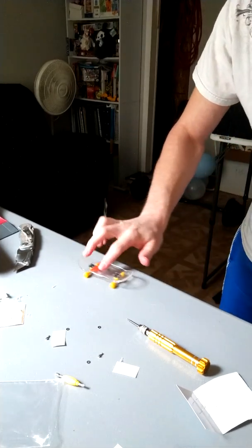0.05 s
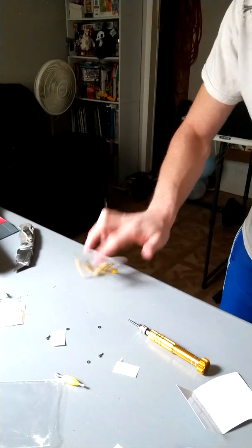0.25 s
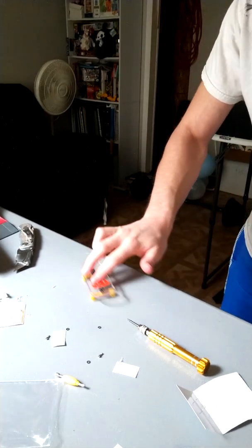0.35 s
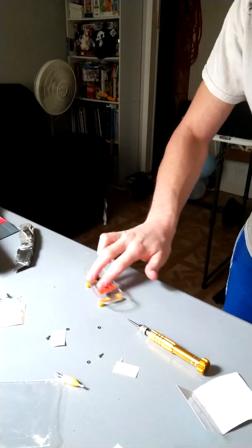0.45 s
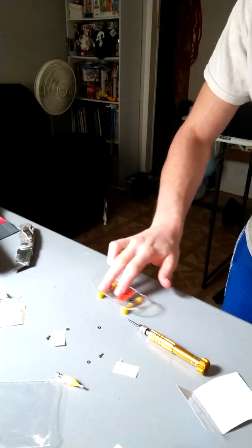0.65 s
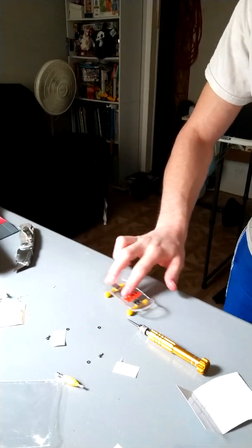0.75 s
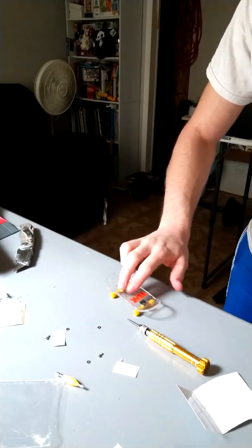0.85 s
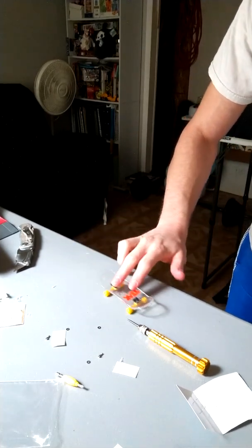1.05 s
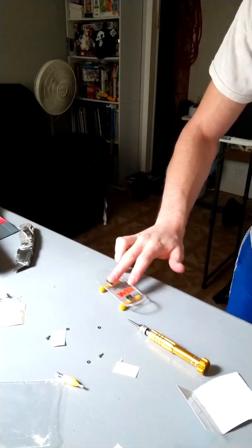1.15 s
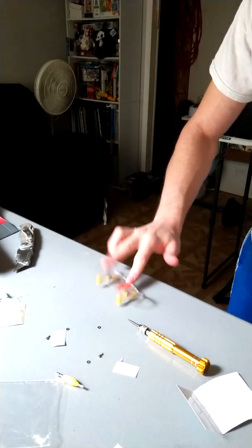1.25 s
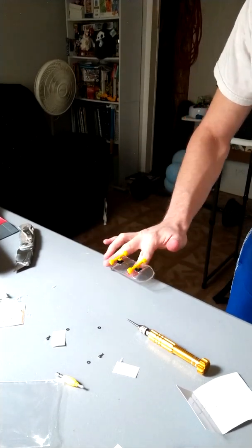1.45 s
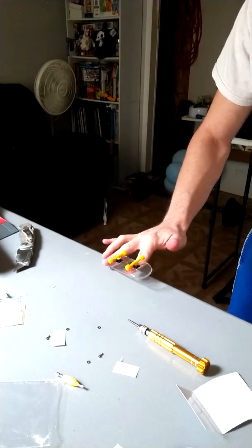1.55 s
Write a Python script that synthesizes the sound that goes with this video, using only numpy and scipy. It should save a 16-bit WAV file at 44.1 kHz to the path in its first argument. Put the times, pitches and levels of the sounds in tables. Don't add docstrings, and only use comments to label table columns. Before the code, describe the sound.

Tiny toy skateboard on a table, close to a phone in a small room: light wheel rumble and axle rattle, crisp pop, brief gap, overloaded burst of plastic, metal and wood knocks, then soft rolling, scuffs and thin clinks.

```python
import sys
import numpy as np
from scipy import signal
from scipy.fft import rfft, irfft
from scipy.io import wavfile
from scipy.ndimage import uniform_filter1d

SR = 44100
rng = np.random.default_rng(int(sys.argv[2]) if len(sys.argv) > 2 else 0)


def inscribe(sig):
    pcm = np.round(np.clip(np.atleast_2d(sig).T, -1, 1) * 32767)
    wavfile.write(sys.argv[1], SR, pcm.astype(np.int16))


def voltage_ratio(decibels):
    exponent = np.asarray(decibels, float) / 20
    return 10 ** exponent


N = 70560

# frequency in Hz, level in dB.
AIR_TONE = [(25, -20), (60, -6), (170, -31.5), (400, -39.5), (1600, -37), (2050, -15), (2900, -30.5),
            (5200, -53), (8000, -49)]
# time in seconds, level in dB.
ROLL_LOAD = [
    [(0.0, -42.5), (0.022, -45.5), (0.096, -40), (0.122, -54.5), (0.158, -48), (0.18, -38), (0.2, -41)],
    [(0.56, -44.5), (0.712, -40), (.81, -47), (.84, -57.5), (1.046, -71), (1.122, -48), (1.298, -47.5),
     (1.35, -59), (1.408, -47), (1.532, -54), (1.6, -76)],
]
# time in seconds, level in dB.
AXLE_RATTLE = [
    [(0, -37.5), (.1, -42.5), (.2, -44)],
    [(.56, -43), (.76, -40), (.89, -45), (1.0, -50), (1.05, -58.5), (1.155, -56.5), (1.17, -48.5),
     (1.36, -46), (1.6, -48)],
]
# start in seconds, axle, truck and deck levels in dB.
TICKS = [(0.0163, -15.5, -19.5, -38), (.2026, -28, -34, -43), (0.5922, -34, -23.5, -14),
         (0.6729, -48, -36, -42), (0.7834, -28.5, -31, -35), (0.8463, -30, -34.5, -45),
         (0.9201, -28.5, -26, -21), (0.9355, -26, -23, -18), (1.0653, -42.5, -41, -45),
         (1.1638, -37, -35.5, -46), (1.29, -28.5, -60, -52), (1.316, -31.5, -61, -40),
         (1.3898, -30, -60, -44), (1.404, -18.5, -28.5, -32), (1.4249, -21, -25, -42),
         (1.449, -27, -34, -16.5), (1.48, -31, -29.5, -44), (1.5196, -50, -35, -37)]
# start and length in seconds, axle, truck and deck levels in dB.
SCUFFS = [(0.051, .04, -26.5, -29.5, -24), (0.208, 0.02, -20.5, -22, -21), (.346, 0.0093, -40.5, -33, -26),
          (0.59, 0.033, -50, -28, -29), (.712, 0.02, -31.5, -27, -37), (1.16, 0.067, -34, -29.5, -31.5),
          (1.287, 0.062, -28.5, -41, -36.5), (1.363, 0.036, -25.5, -31.5, -24.5),
          (1.428, .01, -24, -52, -76), (1.442, .016, -24, -26.5, -21.5), (1.463, 0.035, -21.5, -48.5, -42),
          (1.515, 0.025, -32, -37, -68)]
# start and length in seconds, level in dB.
HUMS = [(0.074, 0.14, -53), (0.6, 0.11, -43.5), (0.669, .06, -39), (0.716, 0.088, -48),
        (0.858, 0.12, -56.5), (1.033, 0.089, -55), (1.094, 0.063, -45), (1.176, 0.079, -45),
        (1.251, 0.069, -45), (1.371, 0.042, -47), (1.438, 0.035, -41)]
# start and length in seconds, level in dB.
THUDS = [(0.166, 0.0085, -54), (.226, 0.0095, -26), (.25, 0.029, -29.5), (0.281, .02, -37.5),
         (0.331, .02, -46.5), (0.562, .05, -28), (0.699, 0.045, -44), (0.888, 0.026, -49),
         (1.396, 0.0112, -40), (1.425, 0.018, -31), (1.473, 0.01, -32.5), (1.503, 0.0279, -40)]
# start in seconds, level in dB.
TAIL_HITS = [
    (0.2112, -19),
    (0.219, -20.5),
    (0.2264, -10.5),
    (0.2297, -12),
    (.245, -20),
    (0.271, -24.5),
]
# start in seconds, level in dB.
BOOMS = [
    (0.271, -29.5),
    (.295, -30.5),
    (.325, -38),
    (.358, -6.5),
    (1.52, -39.5),
]
# start in seconds, metal, deck and table levels in dB.
BLOWS = [(0.2266, 1, -25, -39), (0.2276, 2, -14.5, -47), (0.3557, 1.5, -12, -28), (0.3578, -14.5, -16, -20),
         (0.3617, 4.5, -2.5, -17.5), (.3645, 3.5, -4.5, -11), (.369, 1, -15, -10.5), (0.3742, -4, -9, -8.5),
         (.381, -1, -7.5, -18), (.389, 5.5, 4.5, -10), (0.3916, 16, 1.5, 3), (.398, -9, -4.5, -2.5),
         (.405, -1, -8, -10), (.414, -10.5, -2.5, -10.5), (.425, -7, -7.5, -14), (.436, -4, -7.5, -20)]
# start in seconds, level in dB.
SLAPS = [
    (.364, -21),
    (.392, -0.5),
    (.399, 0.5),
    (.407, -3.5),
    (.418, -15),
]
# start in seconds, level in dB.
CLINKS = [
    (1.377, -36),
    (1.388, -19.5),
    (1.405, -27),
    (1.433, -25),
    (1.451, -23),
    (1.481, -17.5),
    (1.493, -27.5),
    (1.519, -29),
    (1.534, -39),
]

# frequency in Hz, level in dB, 60 dB decay in seconds.
DRUM_MODES = [(118, -9, 0.081), (156.4, 3.5, 0.093), (206, -11, 0.041), (256.8, -9, 0.21), (310, -1, 0.066),
              (377, -7, 0.066), (765, -10, 0.11), (943, -14, 0.11), (1030, -16.5, 0.029)]
PLY_MODES = [(871, -6.5, 0.02), (1260, -12, 0.014), (1422, -13.5, 0.087), (1843, -7.5, 0.033),
             (2008, -4, 0.036), (2183, -8.5, 0.028)]
AXLE_MODES = [(5350, -1.5, 0.0035), (5980, -6, 0.014), (6370, -4, 0.008), (6700, -4, 0.0065),
              (7160, -4, 0.022), (7520, -3, .008), (8000, -2, 0.0015)]
TRUCK_MODES = [(2880, -4, 0.01), (3267, -0.5, 0.011), (3500, -5, 0.0039), (3890, -2, 0.0083),
               (4460, 1.5, 0.0041)]
LEG_MODES = [(86, 2.5, .09), (113, 1, 0.12), (148.3, -1.5, 0.16), (171, -6, 0.098), (197, 0, 0.069),
             (252, -3, 0.12)]
TAIL_MODES = [(1184, -5.5, 0.031), (1253, 0.5, 0.052), (1412, -4, 0.035), (1520, -9, 0.033)]
BOOM_MODES = [(175, 1, 0.089), (203, -0.5, 0.077), (118, -4.5, 0.09)]
METAL_MODES = [(3344, -1.5, 0.0046), (3990, 2, 0.0024), (4370, -3.5, 0.0016), (5155, -5.5, 0.0044),
               (5560, -11.5, 0.0078), (6250, -18.5, 0.0034), (6670, 5.5, 0.0085), (7630, 11.5, 0.002),
               (8610, 17, 0.013)]
DECK_MODES = [(820, -7, 0.0062), (1130, -2, 0.019), (1280, -7, 0.018), (1331, -4.5, 0.033),
              (1421, -16, 0.0031), (1850, -16, 0.011), (2004, -8.5, 0.026), (2180, -5, .015),
              (2197, -2, 0.012), (2500, 1.5, 0.0073)]
TABLE_MODES = [(125.6, -4, 0.1), (169, -1.5, 0.12), (215, -15.5, 0.077), (233, -3, .1), (272, -6.5, 0.1),
               (372, -9.5, .08), (409, -3, 0.1), (481, -5.5, 0.089), (550, -6.5, 0.061), (588, -3.5, 0.088),
               (633, -7, 0.074), (649, -2, 0.06), (726, -9, .07), (885, -8, 0.048)]
PANEL_MODES = [(246, -5, 0.057), (414, 1.5, 0.089), (584.4, 0.5, 0.14), (600, -3, 0.034),
               (648, -0.5, 0.043)]
WASHER_MODES = [(6490, -4.5, 0.041), (6600, -2.5, .018), (7540, -4, 0.014)]
# frequency in Hz, 60 dB decay in seconds, level in dB.
ROOM_BANDS = [(150, 0.41, -11.5), (311, 0.29, -5), (614, 0.26, 0.5), (1200, 0.29, -1.5), (2240, 0.35, -1.5),
              (4000, 0.31, -2), (7000, 0.31, -4.5)]


def rms_one(x):
    return x / np.sqrt(np.mean(x ** 2) + 1e-20)


def high_pass(x, hz, order):
    return signal.sosfilt(signal.butter(order, hz, "high", fs=SR, output="sos"), x)


def ring(clicks, hz, t60):
    radius = voltage_ratio(-60 / (t60 * SR))
    angle = 2 * np.pi * hz / SR
    return signal.lfilter([0, np.sin(angle)], [1, -2 * radius * np.cos(angle), radius * radius], clicks + 1e-18)


def strike(modes, s, db, chatter_s, count=4, swell=0):
    out = 0
    part = rng.random((len(s), count)) * (np.arange(count) > 0)
    when = s[:, None] + np.reshape(chatter_s, (-1, 1)) * part
    for hz, mode_db, t60 in modes:
        clicks = np.zeros(N)
        touch_db = db[:, None] + mode_db - 11 + 2.98 * rng.standard_normal(when.shape)
        size = voltage_ratio(touch_db) * rng.choice([-1, 1], when.shape)
        np.add.at(clicks, (when * SR).astype(int), size * np.sin(np.pi * part) ** swell)
        out = out + ring(clicks, hz, t60)
    return out


def knocks(events, bodies, offsets_db, chatter_s, count=4):
    s, *levels = np.transpose(events)
    counts = (4, 4, count)
    return [strike(modes, s, db + offset, chatter_s, count=n)
            for modes, db, offset, n in zip(bodies, levels, offsets_db, counts)]


def cracks(events):
    crack_db, crack_s, crack_hz = -10, 0.004, 1500
    t = np.arange(N) / SR
    shape = 0
    for s, db, *_ in events:
        shape = shape + voltage_ratio(db + crack_db) * np.exp(-np.maximum(t - s, 0) / crack_s) * (t >= s)
    return shape * high_pass(rng.standard_normal(N), crack_hz, order=2)


def air():
    hz = np.arange(N // 2 + 1) * SR / N + 1
    f, db = np.transpose(AIR_TONE)
    tone = voltage_ratio(np.interp(np.log(hz), np.log(f), db))
    return voltage_ratio(-51.5) * rms_one(irfft(rfft(rng.standard_normal(N)) * tone, N))


def curve(spans, between_db=-61.5):
    in_air = [(.23, between_db), (.45, between_db)]
    s, db = np.transpose(list(spans[0]) + in_air + list(spans[1]))
    return voltage_ratio(np.interp(np.arange(N) / SR, s, db))


def grains(modes, per_s, spread_db):
    out = 0
    for hz, db, t60 in modes:
        hit = rng.random(N) < per_s / SR
        size = voltage_ratio(spread_db * np.minimum(rng.exponential(1, N), 4))
        bumps = hit * size * rng.choice([-1, 1], N)
        out = out + voltage_ratio(db) * ring(bumps, hz, t60)
    return rms_one(out)


def rolling():
    roll_per_s, rattle_per_s = 1100, 1000
    drum = grains(DRUM_MODES[2:], 220.0, 1.3) + voltage_ratio(-5 + 3) * grains(PLY_MODES, roll_per_s, 2.7)
    buzz = voltage_ratio(-7) * grains(AXLE_MODES, rattle_per_s, 1.6)
    buzz = buzz + voltage_ratio(-9.5) * grains(PLY_MODES, rattle_per_s / 2, 2.2)
    buzz = buzz + voltage_ratio(-5.5) * grains(TRUCK_MODES, rattle_per_s, 0.84)
    whirr_hz, whirr_t60_s = 2140, 0.012
    buzz = buzz + voltage_ratio(-8) * rms_one(ring(rng.standard_normal(N), whirr_hz, whirr_t60_s))
    load = curve(ROLL_LOAD)
    bass = load ** 0.71 * voltage_ratio(-14.5) * grains(DRUM_MODES[:2], 200., 0.84)
    return bass + load * drum + curve(AXLE_RATTLE) * buzz


def ticks():
    bodies = (AXLE_MODES, TRUCK_MODES, PLY_MODES)
    return sum(knocks(TICKS, bodies, (1, -0.5, -10), chatter_s=0.0036)) + voltage_ratio(-10.5) * cracks(TICKS)


def scuffs():
    s, length, *levels = np.transpose(SCUFFS)
    bodies = (AXLE_MODES, TRUCK_MODES, PLY_MODES)
    return sum(strike(modes, s, db, length, count=30, swell=0.94) for modes, db in zip(bodies, levels))


def hum():
    hum_hz, hum_t60_s = 591.6, 0.057
    t = np.arange(N) / SR
    swell = sum(voltage_ratio(db) * np.sin(np.pi * np.clip((t - s) / length, 0, 1)) ** 2 for s, length, db in HUMS)
    once = ring(rng.standard_normal(N), hum_hz, hum_t60_s)
    return swell * rms_one(ring(once, hum_hz, hum_t60_s))


def thuds():
    s, length, db = np.transpose(THUDS)
    return strike(LEG_MODES, s, db, length, count=4)


def tail():
    pairs = ((TAIL_MODES, TAIL_HITS), (BOOM_MODES, BOOMS))
    return sum(strike(modes, *np.transpose(hits), .002, count=2) for modes, hits in pairs)


def blows():
    pop_s, landing_s = .0009, .0025
    chatter_s = np.where(np.array(BLOWS)[:, 0] < .3, pop_s, landing_s)
    return knocks(BLOWS, (METAL_MODES, DECK_MODES, TABLE_MODES), (-1.5, 0.5, 4.5), chatter_s, count=1)


def slaps():
    s, db = np.transpose(SLAPS)
    return strike(PANEL_MODES, s, db, .001, count=1)


def clinks():
    s, db = np.transpose(CLINKS)
    return strike(WASHER_MODES, s, db, .003, count=3)


def room(x):
    rise_s = 0.006
    t = np.arange(SR // 2) / SR
    hz = np.array(ROOM_BANDS)[:, 0]
    edges = np.r_[60, np.sqrt(hz[1:] * hz[:-1]), 12000]
    reverb = 0
    for (_, t60, db), low, high in zip(ROOM_BANDS, edges, edges[1:]):
        band_pass = signal.butter(2, [low, high], "band", fs=SR, output="sos")
        reverb = reverb + voltage_ratio(db - 60 * t / t60) * signal.sosfilt(band_pass, rng.standard_normal(len(t)))
    reverb = reverb * (1 - np.exp(-(t / rise_s) ** 2)) * 0.024
    return signal.fftconvolve(x, reverb)[:N]


def scene():
    thin_hz = 700
    metal, deck, table = blows()
    hard = high_pass(metal + deck + cracks(BLOWS), thin_hz, order=2) + table + slaps()
    light = high_pass(ticks() + scuffs() + clinks(), thin_hz, order=2)
    reflections = room(hard + voltage_ratio(0.5) * light)
    board = hard + light + reflections + thuds() + hum() + rolling() + tail()
    return (high_pass(board, 89, order=4) + air())[None]


def low_pass(x):
    return signal.sosfilt(signal.butter(12, 16000, fs=SR, output="sos"), x)


def record(dry):
    mic_hz, top_hz, overload_cut_hz = 8800, 7510, 15800
    notch_hz, notch_width_hz, notch_depth = 1660, 115, .75
    x = dry - notch_depth * signal.lfilter(*signal.iirpeak(notch_hz, notch_hz / notch_width_hz, SR), dry)
    x = signal.sosfilt(signal.cheby2(20, 85, mic_hz, fs=SR, output="sos"), x)
    x = signal.sosfilt(signal.butter(4, top_hz, fs=SR, output="sos"), x)
    knee = 7.
    x = 0.93 * x / (1 + np.abs(x) ** knee) ** (1 / knee)
    above = signal.butter(8, mic_hz, "high", fs=SR, output="sos")
    fizz = voltage_ratio(-19) * uniform_filter1d(x ** 4, size=130) * rng.standard_normal(x.shape)
    splatter_kept = 0.16
    x = x - (1 - splatter_kept) * signal.sosfiltfilt(above, x) + signal.sosfilt(above, fizz)
    x = signal.sosfilt(signal.cheby2(12, 40, overload_cut_hz + 500, fs=SR, output="sos"), x)
    fade_s = 0.058
    fade = np.clip((N - np.arange(N)) / (fade_s * SR), .4, 1)
    mix = np.clip(x, -1, 1) * fade
    return low_pass(mix)


dry = scene()
out = record(dry)
inscribe(out)
```